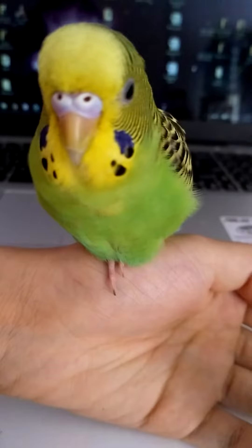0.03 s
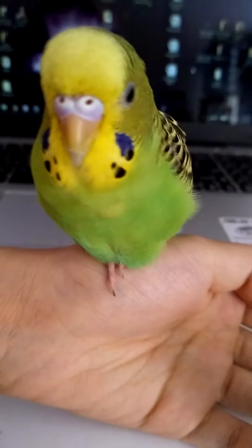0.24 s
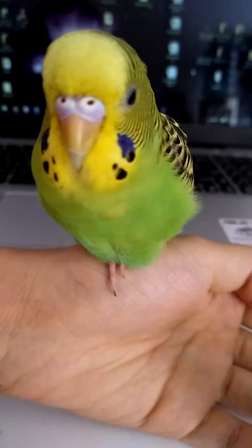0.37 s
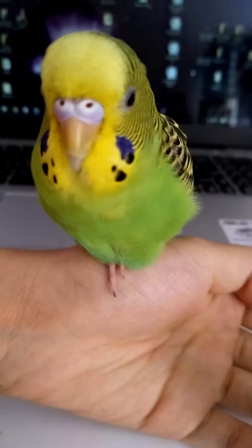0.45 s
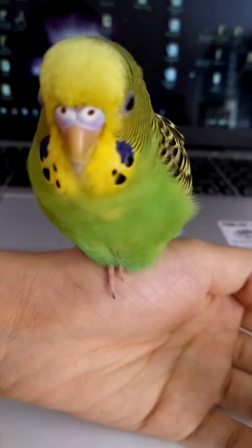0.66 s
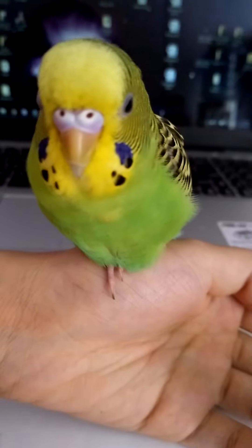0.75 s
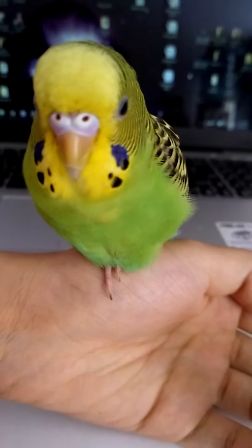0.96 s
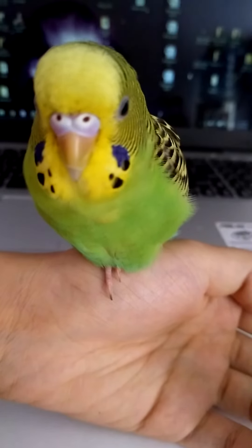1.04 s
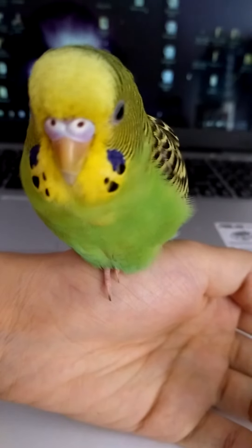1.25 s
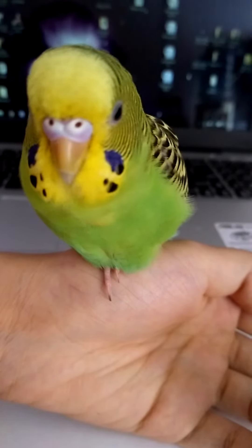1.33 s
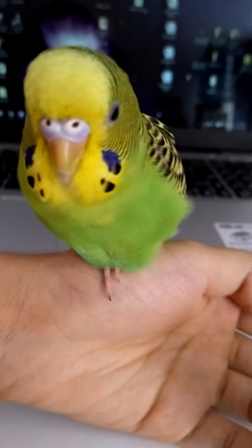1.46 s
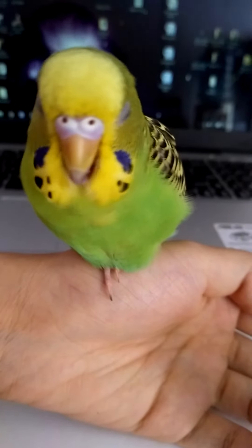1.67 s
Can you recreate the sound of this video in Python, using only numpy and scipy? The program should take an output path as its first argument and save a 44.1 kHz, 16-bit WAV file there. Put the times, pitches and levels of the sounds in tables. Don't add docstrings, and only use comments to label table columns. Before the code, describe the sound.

A small pet parrot chatters up close: dry clicks, a loud snap, buzz, whistle and rasp.

```python
import sys
import numpy as np
from scipy import signal
from scipy.io import wavfile
from scipy.ndimage import uniform_filter1d

SR = 44100
rng = np.random.default_rng(int(sys.argv[2]) if len(sys.argv) > 2 else 0)


def elevation(decibels):
    levels = np.asarray(decibels, float)
    return 10 ** (levels / 20)


def bounce(signal):
    frames = np.transpose(np.atleast_2d(signal))
    limited = np.clip(frames, -1, 1)
    pcm = np.round(limited * 32767).astype(np.int16)
    wavfile.write(sys.argv[1], SR, pcm)


N = 74970


def evened(x):
    return x / np.sqrt(np.mean(x ** 2) + 1e-20)


def read(points, hz):
    f, value = np.transpose(points)
    return np.interp(np.log(hz + 1), np.log(f + 1), value)


def curve(points, t):
    return np.interp(t, *np.transpose(points))


def add(mix, s, sound):
    part = mix[..., round(s * SR):][..., :sound.shape[-1]]
    part += sound[..., :part.shape[-1]]


def wander(size, hz):
    knots = rng.standard_normal(4000)
    return np.interp(np.arange(size) * hz / SR, np.arange(4000), knots)


def phase(hz):
    return 2 * np.pi * np.cumsum(hz) / SR


def resonate(x, hz, width):
    r = np.exp(-np.pi * width / SR)
    return 2 * signal.lfilter([1 - r], [1, -r * np.exp(2j * np.pi * hz / SR)], x).real


def coloured(x, points):
    gain = np.log(elevation(read(points, abs(np.fft.fftfreq(4096, 1 / SR)))))
    response = np.fft.ifft(np.exp(np.conj(signal.hilbert(gain)))).real[:2048]
    return signal.oaconvolve(x, response)[:len(x)]


def budgie():
    out = np.zeros(N)
    chatter(out)
    held_notes(out)
    return out


# t/s, length/s, level/dB, pulse rate f/Hz, tilt/dB per octave
CLICKS = [(.004, 0.011, -44.5, 2030, 1), (0.0225, 0.01305, -46, 2200, 0.5),
          (0.038, 0.0037, -50.5, 1770, 14), (0.028, 0.0015, -45.5, 1460, 4),
          (0.044, 0.0028, -52.5, 1720, 2), (0.0471, 0.00164, -49, 1790, 8.5),
          (0.0475, 0.0085, -44, 1824, -2), (0.511, 0.0029, -42, 977, -6), (0.5157, 0.0036, -36.5, 953, -5),
          (.522, 0.0048, -37.5, 1465, -10), (0.534, 0.012, -44.5, 3050, -8.5),
          (0.8434, 0.01277, -34, 1001, -2.5), (.856, 0.018, -41.5, 1002, -3),
          (1.016, 0.0053, -74.5, 1010, -7.5), (1.25, 0.01447, -65.5, 1025, -14),
          (1.3057, 0.009, -33, 891, -2), (1.315, 0.018, -50.5, 1118, -4), (1.371, 0.0056, -48.5, 930, -5),
          (1.3752, 0.009464, -28.5, 792, -0.5), (1.39, 0.0071, -45.5, 1537, -3),
          (1.4023, 0.004914, -35, 1490, 5), (1.4327, 0.0076, -33.5, 911, -2.5),
          (1.441, 0.0063, -34.5, 1002, 3), (1.375, 0.0035, -38, 1353, 18), (1.407, .006, -50, 1394, 2),
          (1.119, 0.0052, -58.5, 770, -2), (1.126, 0.0055, -56, 815, -3)]
SNAP = [
    (0.2196, 0.0024, -38, 1490, 5.5),
    (0.2205, 0.0065, -21.5, 1102, 1.5),
    (.226, 0.0043, -39.5, 1240, -1.5),
]
# f/Hz, level/dB
WIDE = [(1050, -18.5), (2100, -19), (3300, 2), (4800, -7), (5700, -3), (7000, -15.5), (9500, -16.5),
        (11000, -34.5), (16000, -46)]


def chatter(out):
    for row in CLICKS:
        add(out, *click(*row))
    for row in SNAP:
        add(out, *click(*row, shut=WIDE))


PEEP = [
    (0, 1944, -35.5),
    (.004, 2030, -43.5),
    (.0065, 1900, -40),
]
SIGH = [
    (.352, 1504, -72),
    (.368, 1492, -60),
    (.38, 1534, -61.5),
    (.42, 1500, -69),
]
BUZZ = [
    (.449, 615, -38),
    (.452, 597.4, -42.5),
    (.474, 596.7, -40),
    (.5, 600.4, -40.5),
    (.506, 636, -39),
    (.509, 696, -40.5),
]
WHISTLE = [
    (.543, 1520, -43),
    (.548, 1520, -37),
    (.556, 1526, -37),
    (.572, 1510, -34),
    (.58, 1490, -37),
    (.592, 1426, -33),
    (.602, 1410, -39),
    (.612, 1490, -53),
]
WHISTLE_FADE = [
    (.606, 1480, -55),
    (.62, 1480, -53),
    (.66, 1495, -55),
    (.70, 1510, -63),
]
RASP = [
    (1.037, 699.7, -54),
    (1.045, 691.4, -48.5),
    (1.072, 655.3, -44.5),
    (1.108, 646.7, -46),
    (1.118, 656, -55),
    (1.135, 637, -61),
]
FAR_PEEP = [
    (1.59, 1820, -109),
    (1.63, 1720, -73.5),
    (1.66, 1693, -85),
    (1.699, 1658, -87),
]
# t/s, level/dB
WHISTLE_BODY = [(.543, 3), (.555, 9.5), (.565, 6.5), (.578, 15.5), (.592, 12), (.603, 8.5), (.612, 7)]
# f/Hz, level/dB
BUZZ_BEAK = [(600, -11.5), (1200, -2), (1800, 1), (2400, -10.5), (3000, 1.5), (5500, -17.5), (6600, -1.5),
             (8600, -17), (12000, -27), (14500, -52)]
WHISTLE_BEAK = [(1500, -4), (3000, -0.5), (4500, -5.5), (5200, -18), (7500, -10), (9500, -29),
                (12300, -34.5), (13500, -57)]
SHUT = [(600, -17), (1250, -8), (3000, -4), (3700, -2.5), (5200, -13), (6900, -10.5), (9500, -27),
        (14000, -52)]


def held_notes(out):
    add(out, *note(PEEP, 0.063, -2.5, first_db=4.5))
    add(out, *note(SIGH, 0.93, 6.2))
    add(out, *note(BUZZ, 0.14, -3, first_db=-3, shut=BUZZ_BEAK))
    add(out, *note(WHISTLE, 0.12, 5, first_db=WHISTLE_BODY, shut=WHISTLE_BEAK))
    add(out, *note(WHISTLE_FADE, 0.03, -12, first_db=24, shut=SHUT))
    add(out, *note(RASP, 0.78, -5.5, throb_db=3.5))
    add(out, *note(FAR_PEEP, 0.03, -12, first_db=10, shut=SHUT))


CLICK_ROUGH, CLICK_PEAK_AT, CLICK_GLIDE, CLICK_SOFT = 0.6, 0.36, 0.4, 0.55


def click(start, length, db, hz, tilt_db, shut=None):
    u = np.arange(0, length, 1 / SR) / length
    rise, fall = u / CLICK_PEAK_AT, (1 - u) / (1 - CLICK_PEAK_AT)
    level = elevation(db) * evened(np.minimum(rise, fall) ** CLICK_SOFT)
    pitch = hz * (1 + CLICK_GLIDE * (u - 0.5))
    return start, syrinx(pitch, level, CLICK_ROUGH, tilt_db, shut=shut, neck=neck_stretch(start))


RASP_THROB_HZ = 125


def note(rows, rough, tilt_db, first_db=0, throb_db=0, shut=None):
    s, hz, db = np.transpose(rows)
    t = np.arange(s[0], s[-1], 1 / SR)
    if np.ndim(first_db):
        first_db = curve(first_db, t)
    throb = throb_db * np.sin(phase(RASP_THROB_HZ * (1 + 0.36 * wander(len(t), 61.2))))
    pitch, level = np.interp(t, s, hz), elevation(np.interp(t, s, db) + throb)
    return s[0], syrinx(pitch, level, rough, tilt_db, first_db, shut, neck_stretch(s[0]))


# t/s, stretch/percent
NECK = [(.02, 0.33), (.05, 0.25), (.222, 3), (.4, 0.31), (.52, 0.27), (.85, .3), (.865, 0.4), (1.08, 0.27),
        (1.31, .3), (1.38, .3), (1.404, 0.24), (1.436, 0.19), (1.445, .3)]


def neck_stretch(s):
    return curve(NECK, s)


# f/Hz, width/Hz, level/dB
THROAT = [(1097, 1095, -4), (2200, 1774, 2.5), (3293, 1000, 4.5), (3915, 170, 8.5), (5230, 1120, 2.5),
          (8250, 1780, 0.5), (8720, 3320, -6), (13400, 1300, -46.5)]
THROAT_SPREAD = 0.07
# f/Hz, level/dB
OPEN = [(400, 2), (800, 1), (9500, -2), (10800, -10.5), (14200, -10.5), (15600, -41)]


def syrinx(hz, level, rough, tilt_db, first_db=0, shut=None, neck=0):
    size = len(hz)
    uneven = 1 + 0.3 * rough * wander(size, 1400) + 0.007 * wander(size, 150)
    turns = np.cumsum(hz * uneven) / SR
    k = np.arange(1, 26)[:, None]
    weight = elevation(tilt_db * np.log2(k) + first_db * (k == 1)) * (k * hz < 15000)
    harmonics = weight * np.cos(2 * np.pi * k * turns + 0.3036 * k ** 2)
    folds = evened(harmonics.sum(0)) * elevation(1.71 * rough * wander(size, 920))
    air = (0.17 + np.exp(-(turns % 1) / 0.2)) * rng.standard_normal(size)
    puffs = coloured(air, [(450, -32), (900, -0.5), (16000, 4 * tilt_db)])
    blend = (1 - 0.6 * rough) * folds + 0.6 * rough * evened(puffs)
    drive = np.pad(level * blend, (0, 900))
    stretch = 1 + neck / 100 + THROAT_SPREAD * rng.uniform(-0.91, 1)
    if shut is not None:
        out = coloured(drive, shut)
    else:
        rung = np.zeros(len(drive))
        for n, (f, width, db) in enumerate(THROAT):
            rung += (-1) ** n * elevation(db) * resonate(drive, f * stretch, width)
        out = coloured(rung, OPEN)
    return out * np.sqrt(np.sum(level ** 2) / np.sum(out ** 2))


# t/s, level/dB, ring f/Hz, time to fall 60 dB/s, pan/dB (plus is left)
TICKS = [
    (0.423, -60, 207, 0.033, 0),
    (1.192, -57, 537, 0.093, -4),
    (1.254, -57, 455, 0.088, 6.5),
    (1.5877, -46.5, 6590, 0.0044, 8.5),
    (1.6116, -44, 6910, 0.013, -15.5),
    (1.682, -59.5, 6030, 0.0185, 8),
]


def beak():
    out, t = np.zeros((2, N)), np.arange(4000) / SR
    for s, db, hz, t60, pan_db in TICKS:
        snap = rng.standard_normal(4000) * elevation(-60 * t / t60) * np.minimum(t / (0.042 * t60), 1)
        ring = resonate(resonate(snap, hz, 0.457 * hz), hz, 0.417 * hz)
        bright = coloured(snap, [(3000, -24), (7000, 8), (13000, 10), (16000, -20)])
        tick = ring + 5 * t60 * (hz / 6000) ** 2 * bright
        pan = elevation(np.array([[0.5], [-0.5]]) * pan_db)
        add(out, s, elevation(db) * tick / abs(tick).max() * pan)
    return out


# f/Hz, level/dB
LEFT = [(300, 6.5), (700, 6), (2300, 5.5), (2700, -10), (3100, 1), (6000, -1.5), (8000, -3), (14000, -7)]
RIGHT = [(300, -1), (700, 6), (2700, 2.5), (4300, -2), (5500, -10), (6500, -9), (7600, 3.5), (14000, -2.5)]
RIGHT_LAG = 14


def ports(voice):
    late = np.pad(voice, (RIGHT_LAG, 0))[:N]
    return np.array([coloured(voice, LEFT), coloured(late, RIGHT)])


# f/Hz, time/s
ROOM_T60 = [(500, 0.25), (1500, 0.34), (4000, 0.34), (10000, 0.314)]
# f/Hz, level/dB
ROOM_COLOUR = [(500, 2), (1500, -2), (2300, -2.5), (3000, -3.5), (4000, -1), (6000, 1), (10000, -3)]
ROOM_DB, EARLY_DB, EARLY_T60 = -17, -17, 0.034


def room(x):
    size = SR // 2
    taps = np.zeros((2, size))
    slots = np.arange(80, size - 20, 20)
    at = slots + rng.integers(0, 20, (2, len(slots)))
    np.put_along_axis(taps, at, rng.choice([-1., 1.], at.shape), 1)
    hz, t, z = signal.stft(taps, SR, nperseg=256)
    fading = z * elevation(-60 * t / read(ROOM_T60, hz)[:, None])
    tail = signal.istft(fading, SR, nperseg=256)[1][:, :size]
    early = taps * elevation(-60 * np.arange(size) / SR / EARLY_T60)
    late = np.array([coloured(v, ROOM_COLOUR) for v in tail]) / np.linalg.norm(tail[0])
    echoes = elevation(ROOM_DB) * late + elevation(EARLY_DB) * early / np.linalg.norm(early[0])
    return signal.fftconvolve(x, echoes, axes=1)[:, :N]


# f/Hz, level/dB
HUM = [(34, -34), (46, 1.5), (58, 0.5), (80, -1), (369, -14.5), (587, -18.5), (945, -18), (1200, -32),
       (1560, -35), (2640, -120)]
HUM_DB = -66
# t/s, level/dB
HUM_SWELL = [(0, -1), (.4, -4), (.7, 7), (.85, 2.5), (1.06, 1.5), (1.2, -0.5), (1.42, 5.5), (1.55, -1.5),
             (1.7, -1.5)]
# f/Hz, likeness/0 to 1
SAME = [(60, 0.97), (300, 0.91), (640, 0.88), (1400, 0)]
# f/Hz, level/dB
FAN = [
    (58, -70),
    (192, -74),
    (243, -78.5),
    (531, -78),
]


def hum():
    frames, hz = N // 512 + 5, np.fft.rfftfreq(2048, 1 / SR)
    a, b, c, d, patches = rng.standard_normal((frames, 1025, 5)).T
    patches = uniform_filter1d(uniform_filter1d(patches, size=5, axis=0), size=6, axis=1)
    lumps = elevation(read(HUM, hz)[:, None] + 3.97 * evened(patches))
    same, left = np.clip(read(SAME, hz), -1, 1)[:, None], a + 1j * b
    right = same * left + np.sqrt(1 - same ** 2) * (c + 1j * d)
    rumble = signal.istft(np.array([left, right]) * lumps, nperseg=2048, noverlap=1536)[1][:, :N]
    out = elevation(HUM_DB + curve(HUM_SWELL, np.arange(N) / SR)) * evened(rumble)
    for f, db in FAN:
        out = out + elevation(db + 2.4 * wander(N, 13.0)) * np.sin(phase(f + 2.032 * wander(N, 9)))
    return out


# f/Hz, level/dB
HISS_LEFT = [(300, -14), (1000, -7.5), (3000, -2.5), (5200, -10.5), (6200, -0.5), (8000, -9),
             (12000, -11.5), (14300, -9)]
HISS_RIGHT = [(300, -5.5), (1500, -1), (3000, -4.5), (5300, -11), (6500, -1.5), (8500, -6.5), (12000, -13),
              (14300, -10)]
# t/s, level/dB
HISS_SWELL = [(0, 10.5), (.2, 2), (.4, 6.5), (.65, 7), (.82, -1), (.9, 5.5), (1.0, -1), (1.1, 6.5),
              (1.279, -3.5), (1.33, 16.5), (1.5, 4), (1.7, 4.5)]
HISS_DB, HISS_TOP_HZ = -68.5, 13600


def hiss():
    top = signal.butter(12, HISS_TOP_HZ, fs=SR, output="sos")
    left, right = signal.sosfilt(top, rng.standard_normal((N, 2)).T)
    level = elevation(HISS_DB + curve(HISS_SWELL, np.arange(N) / SR))
    return level * np.array([coloured(left, HISS_LEFT), coloured(right, HISS_RIGHT)])


def scene():
    bird = ports(budgie()) + beak()
    return bird + room(bird) + hum() + hiss()


def low_pass(x):
    return signal.sosfilt(signal.butter(12, 15750, fs=SR, output="sos"), x)


def record(dry):
    return low_pass(dry)


dry = scene()
out = record(dry)
bounce(out)
```